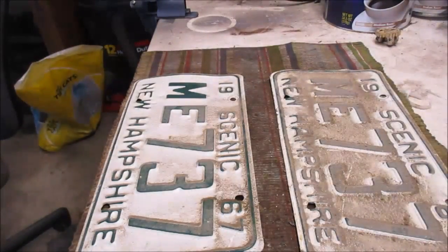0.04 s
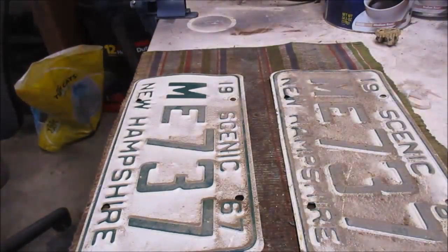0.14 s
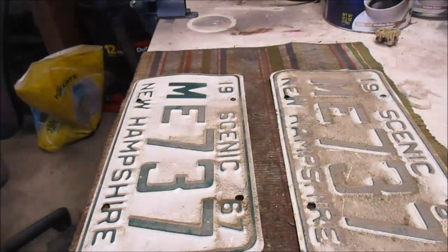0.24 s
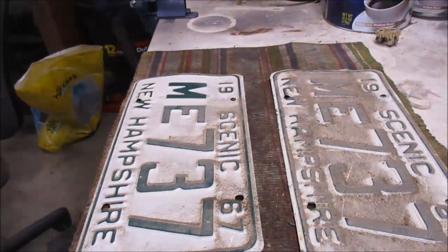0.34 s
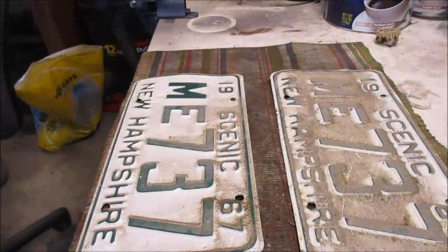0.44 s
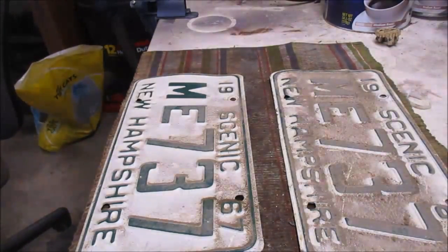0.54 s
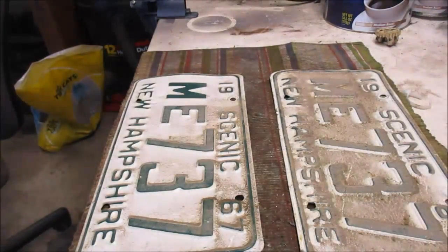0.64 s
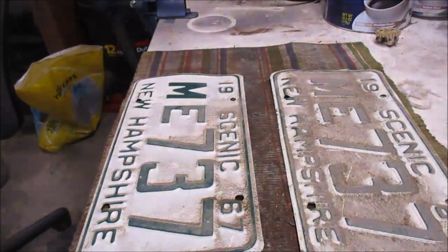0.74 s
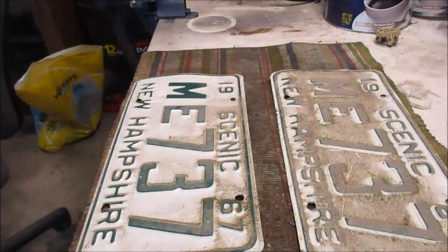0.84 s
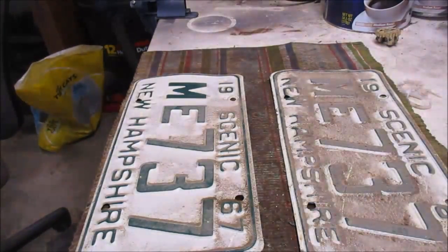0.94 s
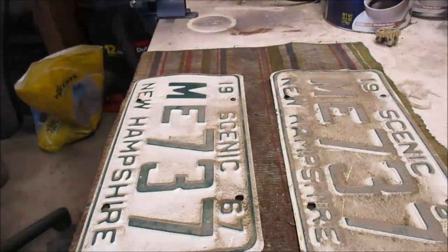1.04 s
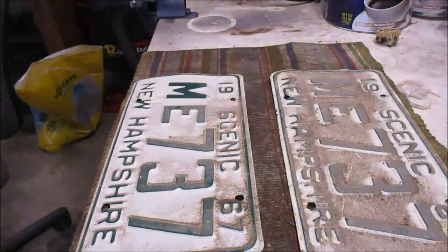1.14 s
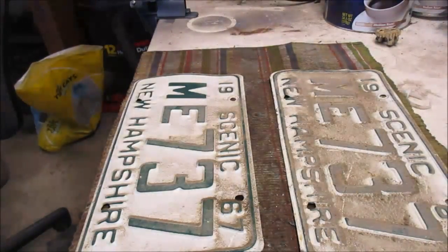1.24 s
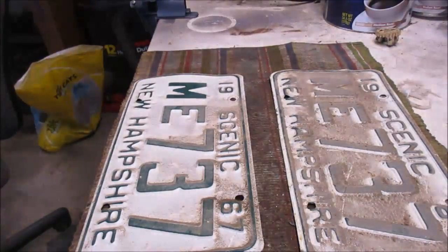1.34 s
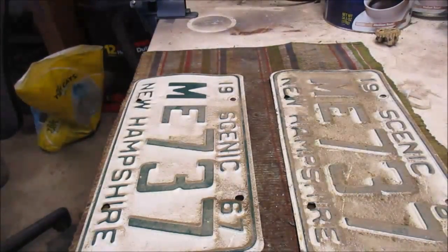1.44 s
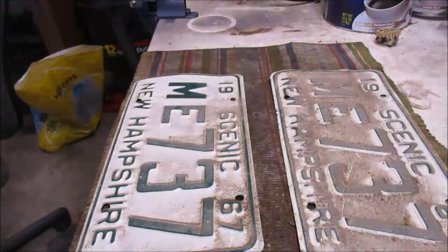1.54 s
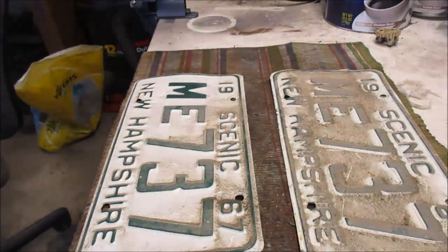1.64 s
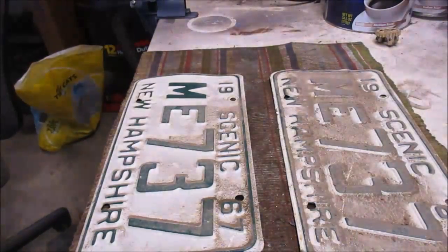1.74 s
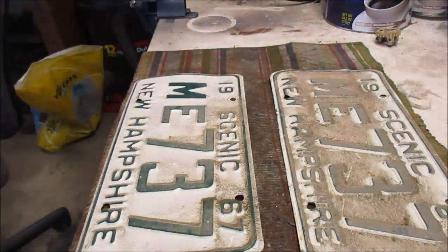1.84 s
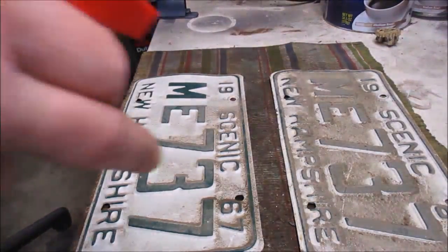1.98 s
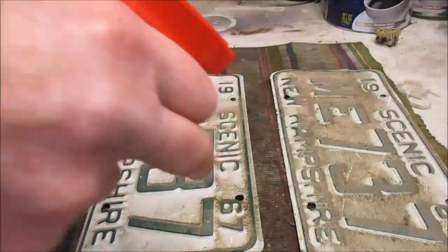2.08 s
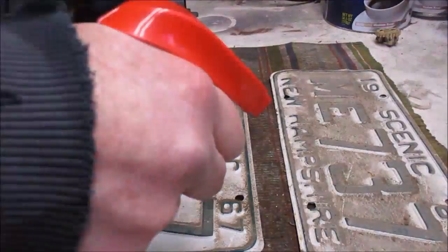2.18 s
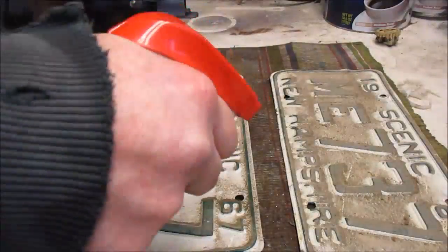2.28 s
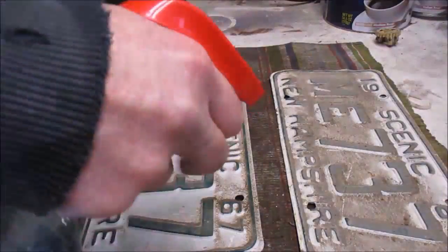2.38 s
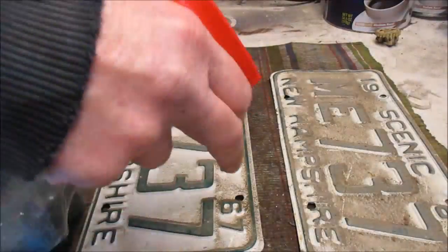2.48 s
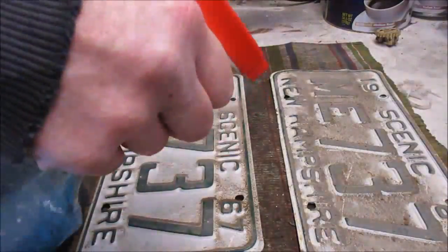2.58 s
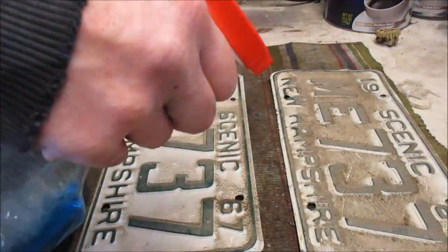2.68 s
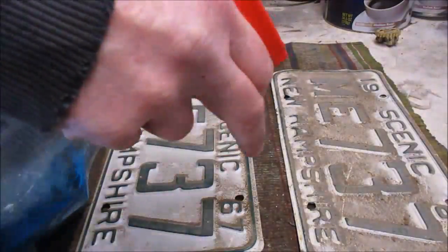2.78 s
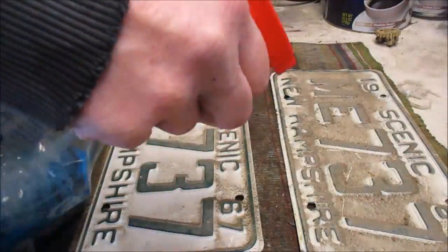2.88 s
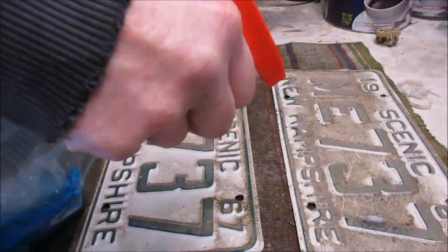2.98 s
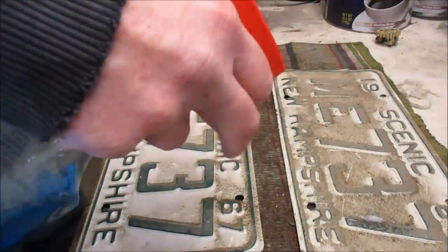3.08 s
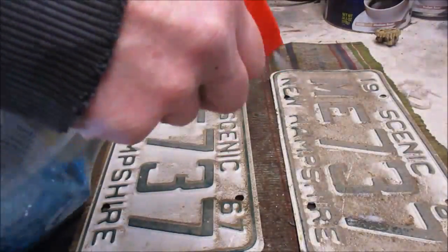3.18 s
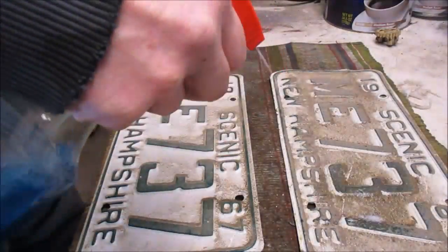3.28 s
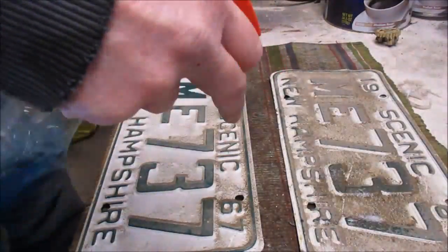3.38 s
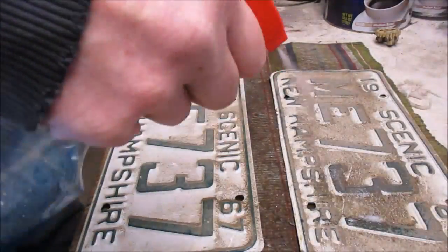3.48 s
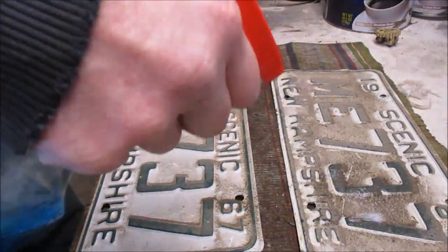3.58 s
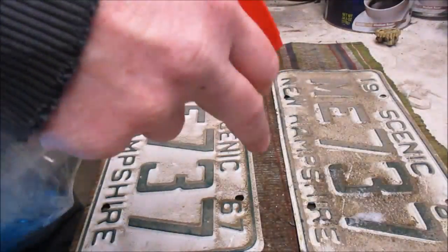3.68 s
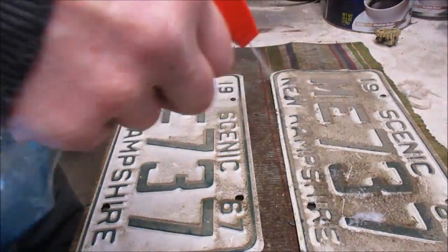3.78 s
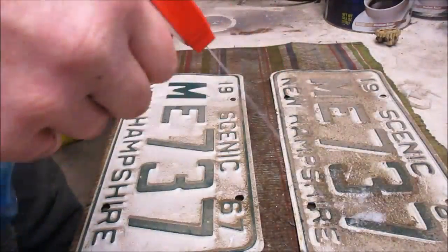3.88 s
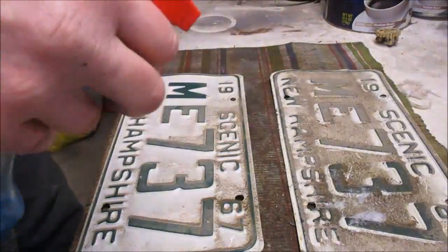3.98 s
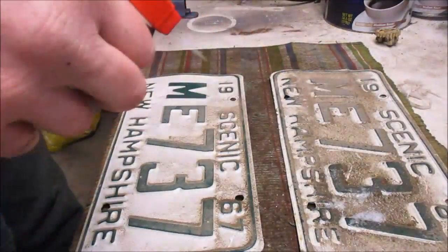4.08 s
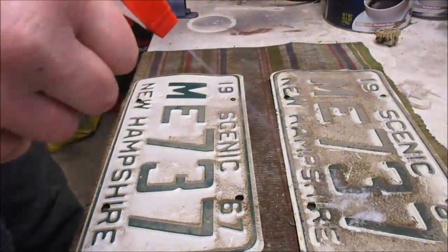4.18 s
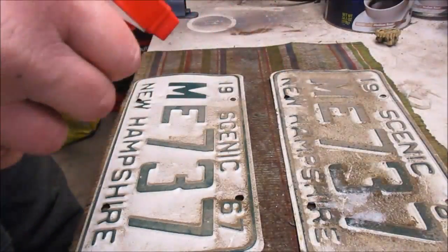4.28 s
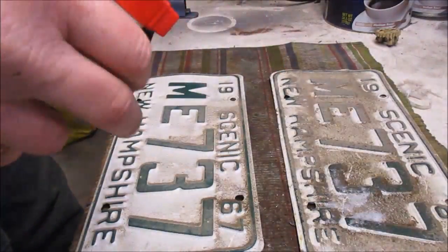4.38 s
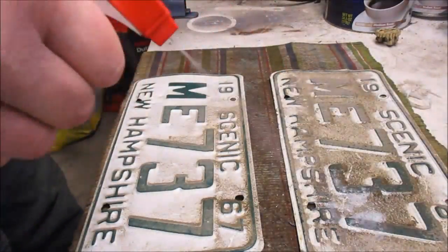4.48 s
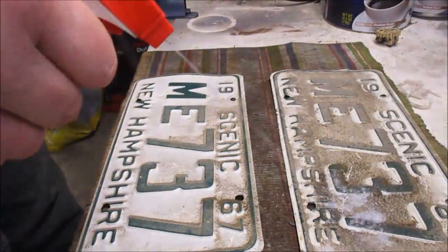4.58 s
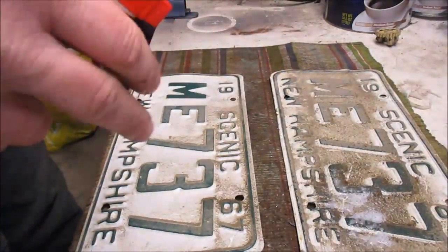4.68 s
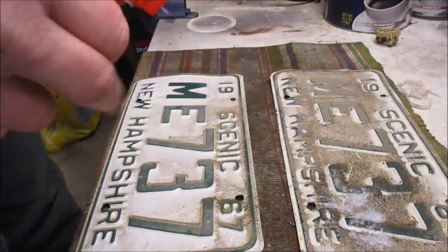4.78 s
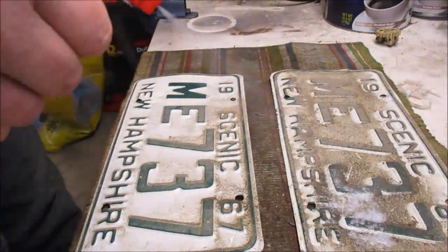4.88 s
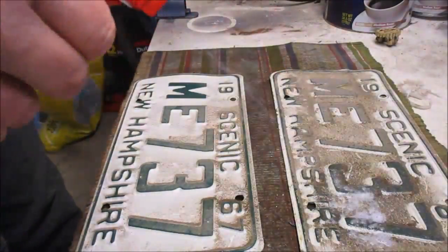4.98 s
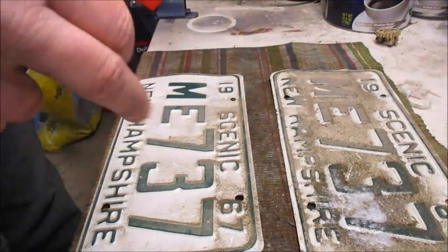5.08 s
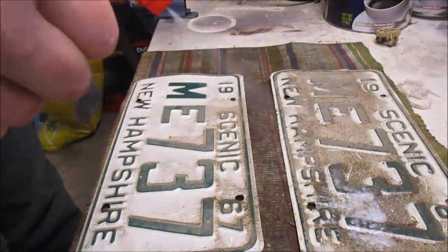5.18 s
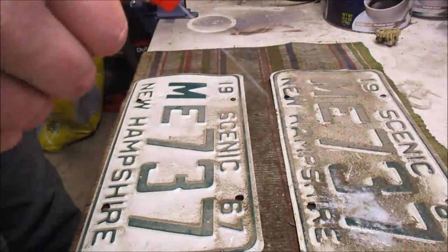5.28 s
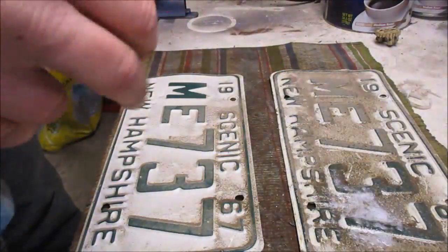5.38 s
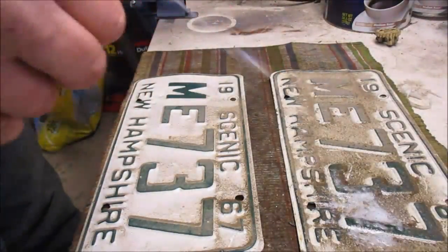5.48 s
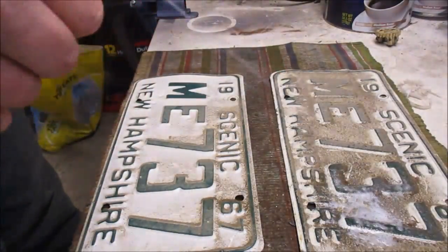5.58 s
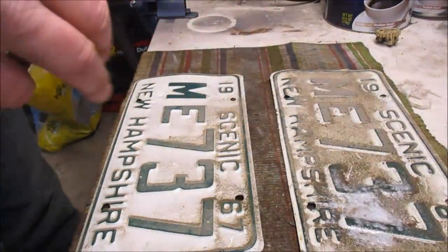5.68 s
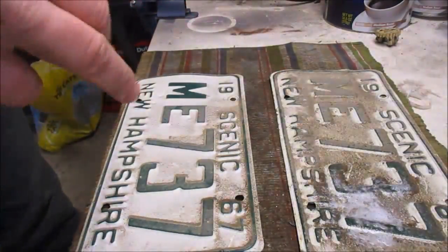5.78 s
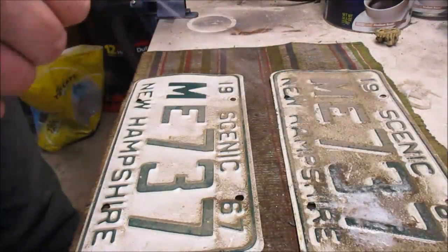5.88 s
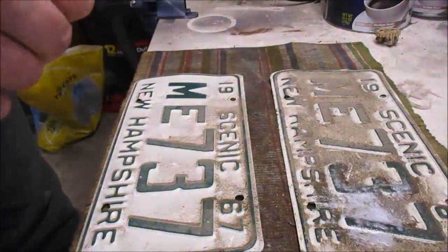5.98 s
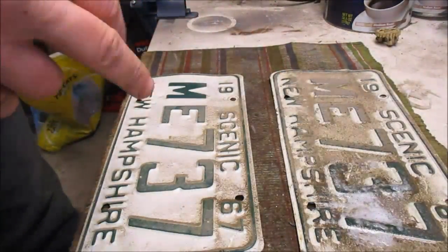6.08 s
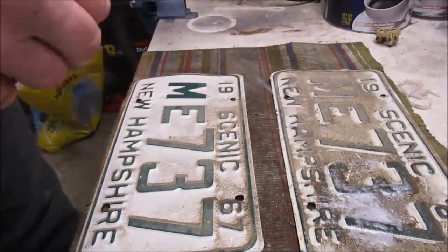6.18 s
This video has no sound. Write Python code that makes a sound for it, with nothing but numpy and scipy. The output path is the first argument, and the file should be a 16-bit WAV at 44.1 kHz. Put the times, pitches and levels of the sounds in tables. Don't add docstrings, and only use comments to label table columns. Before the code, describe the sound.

After two quiet seconds of room tone and faint rustles, a plastic trigger sprayer knocks, then spritzes rapidly in short wet hisses about three times a second.

```python
import sys
import numpy as np
from scipy import signal
from scipy.fft import rfft, irfft, next_fast_len
from scipy.io import wavfile
from scipy.ndimage import uniform_filter1d

SR = 44100
rng = np.random.default_rng(int(sys.argv[2]) if len(sys.argv) > 2 else 0)


def output_pcm(signal):
    pcm = np.clip(np.atleast_2d(signal).T, -1, 1) * 32767
    wavfile.write(sys.argv[1], SR, np.round(pcm).astype(np.int16))


def volts(x):
    e = np.asarray(x, float) / 20
    return 10 ** e


N = 275013
TOP_HZ = 15800

# (time [s], level [dB])
ROOM_LEVEL = [
    (0.0, -50),
    (2.36, -50.5),
    (2.6, -56.5),
    (3.14, -58.5),
    (3.34, -54),
    (4.17, -52),
    (5.21, -52.5),
    (6.0, -46.5),
    (6.24, -48.5),
]
# (frequency [Hz], density [dB per Hz])
ROOM_COLOUR = [(12, -44), (20, -8.5), (74, 2.5), (146, -8.5), (198, 0.5), (270, -4.5), (293, -3), (542, -2),
               (897, -7), (1030, -6), (1260, -7), (1440, -9.5), (3950, -24), (8410, -28), (16000, -39)]
# (frequency [Hz], level [dB])
HUM_HARMONICS = [(302, -2), (608, -2), (915, -1)]
# (time [s], first [dB], second [dB], third harmonic [dB])
HUM_SWELL = [(0.0, -58, -60, -60), (.13, -54, -58, -60), (.24, -62, -60, -60), (.36, -64, -55, -66),
             (.5, -57, -58, -58), (.62, -59, -68, -58), (.72, -60, -63, -68), (.87, -58, -54, -57),
             (1.0, -65, -60, -70), (1.15, -63, -62, -57), (1.4, -72, -61, -59), (1.7, -72, -70, -68),
             (2.05, -70, -58, -70), (2.4, -68, -57, -68), (2.9, -72, -68, -72), (4.3, -66, -61, -66),
             (5.0, -68, -63, -67), (6.24, -77, -72, -77)]
# (start [s], hold [s], level [dB], fade [dB per s], rise [dB per s])
BRUSHES = [
    (0, .01, -55, 110, 600),
    (.32, 0.099, -54, 110, 600),
    (0.4365, 0.025, -46, 130, 8000),
    (0.874, 0.15, -56, 100, 600),
    (1.532, 0.045, -51, 172, 600),
    (1.617, 0.036, -50.5, 174, 600),
    (1.82, .01, -56.5, 103, 600),
    (2.227, .01, -56, 15, 600),
]
# (frequency [Hz], density [dB per Hz])
RUSTLE_COLOUR = [(590, 0.5), (1000, -5), (1570, -8), (1810, -9.5), (4120, -14.5), (10500, -26.5),
                 (16000, -48)]
# (time [s], peak [dB], pitch [Hz], t60 [s], answer of the hollow bottle [dB])
HANDLING = [
    (0.281, -40.5, 318, 0.051, -6),
    (0.869, -30, 190, 0.035, -20),
    (0.957, -44, 282, 0.045, -6),
    (1.489, -39, 670, 0.036, -8),
    (1.5745, -26.5, 565, 0.055, -14),
    (2.139, -15.5, 280, 0.015, -1),
    (2.22, -31, 640, 0.04, -8),
    (2.259, -43, 220, 0.073, -1),
]
# (time [s], peak [dB], pitch [Hz], t60 [s])
BODY_THUMPS = [(2.495, -12.5, 388.4, 0.041), (2.548, -26.5, 353, 0.028), (2.821, -19, 310, 0.024),
               (2.87, -27.5, 337, 0.02), (3.119, -20.5, 390, 0.033), (3.161, -26.5, 337, 0.0078),
               (3.401, -24.5, 297, 0.058), (3.48, -25.5, 320, 0.031), (3.712, -21.5, 324, 0.027),
               (3.795, -19.5, 314, 0.037), (4.052, -21.5, 325, 0.055), (4.118, -21.5, 327, 0.038),
               (4.399, -21, 330, 0.046), (4.466, -20, 313, 0.045), (4.75, -18, 328, 0.063),
               (4.816, -21.5, 333, 0.04), (5.068, -20, 350, 0.025), (5.162, -21, 330, 0.046),
               (5.443, -18, 350, 0.039), (5.496, -20.5, 336, 0.047), (5.775, -14.5, 322, 0.05),
               (5.846, -15.5, 327, 0.038), (6.1305, -16.5, 335, 0.034), (6.191, -24, 297, 0.035)]
# (time [s], peak [dB], pitch [Hz])
NUDGES = [(2.389, -32, 313), (2.741, -38, 288), (2.769, -39, 286), (3.054, -40.5, 270), (3.378, -31, 302),
          (3.474, -39, 328), (3.663, -32.5, 294), (3.78, -40, 346), (3.985, -36, 276), (4.04, -32, 302),
          (4.097, -34.5, 350), (4.33, -41.5, 327), (5.021, -36.5, 340), (5.144, -35, 328),
          (5.367, -42.5, 270), (5.401, -34.5, 460), (5.425, -38, 340), (5.484, -35, 292),
          (5.699, -33.5, 340), (5.734, -34, 358), (6.055, -24.5, 320), (6.14, -16, 337)]
# (frequency [Hz], level [dB], t60 [s])
BOTTLE_MODES = [(350, -12.5, 0.083), (270, -10.5, 0.073), (500.5, -15.5, 0.041), (604, -20, 0.073),
                (1072, -19, 0.049), (1258, -18, 0.03)]
# (time [s], peak [dB], pitch [Hz], t60 [s])
WRIST_BUMPS = [
    (0.283, -45, 125, 0.24),
    (0.868, -42, 110, 0.06),
    (2.139, -34, 150, .04),
    (2.256, -35, 83.5, 0.099),
    (3.48, -39.5, 114, 0.15),
    (3.808, -48.5, 102, 0.21),
]
# (time [s], peak [dB], pitch [Hz], t60 [s])
WALL_CLACKS = [
    (2.14, -16.5, 444, 0.044),
    (2.4955, -17, 1204, 0.022),
    (2.8205, -13, 537, 0.029),
]
# (time [s], peak [dB], pitch [Hz], t60 [s])
FINGER_TAPS = [
    (1.585, -34, 610, 0.074),
    (1.594, -41, 500, .06),
    (2.629, -38.5, 325, 0.04),
    (3.361, -32, 300, .025),
    (4.667, -36, 317, 0.045),
]
# (time [s],
# peak [dB], pitch [Hz], t60 [s])
CONTACTS = [(4.0213, -28, 8300, .004), (4.096, -39, 2600, .008), (4.328, -47, 4800, .006),
            (4.702, -19, 8300, 0.0045), (5.403, -19, 7760, .004), (.4355, -30, 1230, .012),
            (1.456, -38, 4970, .006), (1.4556, -42, 2800, .006), (1.464, -44, 5200, .006),
            (1.49, -35, 950, .02), (1.65, -37, 1100, .015), (1.8095, -31, 1480, .006),
            (1.809, -46, 3600, .005), (2.4959, -10, 1350, 0.0092), (2.4963, -10, 4440, .015),
            (2.4973, -4, 6390, .018), (2.4977, -23, 9300, .007), (2.4978, -16, 11500, .007),
            (2.4987, -22, 2500, 0.011), (2.8202, -20.5, 1220, 0.021), (2.8203, -27.5, 2700, .012),
            (2.8217, -16, 1920, 0.0099), (2.8227, -8.5, 5900, .012), (2.8226, -12, 4410, 0.0087),
            (2.8228, -9.5, 10100, .006), (2.8262, -33, 10800, .01), (3.1155, -23, 4480, 0.0062),
            (3.115, -28, 8700, .007), (3.1156, -24.5, 3050, .008), (3.1165, -24, 1540, 0.018),
            (3.1192, -26, 5600, 0.01), (3.1232, -26, 5950, 0.012), (3.1218, -24, 2580, .018),
            (4.749, -8.5, 8070, 0.01), (4.7489, -10.5, 3670, 0.0068), (4.7487, -21, 2090, 0.028),
            (4.7548, -29, 8300, .012), (6.1297, -15, 2900, 0.0083), (6.1294, -21, 7900, .01),
            (6.1297, -27, 2160, .035), (6.1406, -5, 8300, .009), (6.1405, -13.5, 3000, 0.017),
            (6.1404, -13, 5100, .008), (6.1405, -18, 2140, .03), (6.1406, -17, 3960, 0.028),
            (6.1406, -16, 11400, 0.0064), (6.1418, -19, 4030, .008), (6.144, -26, 2410, .01),
            (6.149, -29, 8200, .008), (2.4986, -14, 6230, .006), (2.505, -25, 6000, .008),
            (2.8238, -20, 6160, .006), (4.7503, -23, 5610, .006),
            (.4354, -35, 990, .008), (2.214, -32, 430, .03), (2.2215, -36, 1600, .012),
          (2.224, -28, 950, .025), (2.232, -30, 480, .04), (2.238, -33, 650, .03), (2.246, -34, 830, .03),
          (2.259, -35, 900, .03), (2.174, -38, 800, .04), (2.14, -28, 1000, .02), (.8715, -34, 330, .012),
          (1.541, -44, 600, .06), (1.57, -38, 520, .02), (3.689, -35, 380, .03), (3.689, -35, 1200, .02),
          (3.59, -43, 300, .03), (5.79, -26, 360, .03), (5.79, -34, 1250, .02), (5.847, -28, 1230, .03),
          (4.408, -30, 380, .03), (4.273, -36, 1200, .015), (4.097, -38, 1300, .012),
          (4.362, -42, 1250, .02), (3.776, -40, 1350, .02)]
# (time [s], peak [dB], centre [Hz])
EDGE_SNAPS = [(2.496, -12, 5000), (2.4975, -9, 11000), (2.82, -28, 6000), (2.8228, -8, 10000),
              (3.1156, -20, 6000), (3.123, -30, 8000), (4.749, -6, 7000), (2.823, -12, 12000),
              (6.1295, -16, 6000), (6.1405, -14, 8000), (.4355, -36, 3000), (.453, -38, 4000),
              (.446, -42, 7000)]
# (time [s], peak [dB], low share [dB], top share
# [dB], strongest ring [Hz])
TRIGGER_KNOCKS = [(0.4358, -47, 14, -16, 1590), (1.4555, -48, -4, -26, 5140), (1.8088, -55, 23, -29, 1820),
                  (2.1391, -34.5, 8.5, -25, 1800), (2.4957, -9.5, -2, -10, 6100), (2.8226, -15, 1, 5, 5300),
                  (3.1153, -20, 2, -40, 1490), (3.401, -40.5, 16.5, -12, 1610),
                  (3.7133, -33.5, 10, -15, 3350), (3.7948, -40, 2, -10, 1490),
                  (4.0518, -32.5, 10, -20, 1730), (4.399, -36, -15, -25, 7800),
                  (4.4647, -32.5, -19, -19, 2190), (4.7487, -16, 5, -1, 8200), (4.8164, -50, 15, 2, 2000),
                  (5.0694, -33.5, 8.5, -14, 7880), (5.163, -35, 6, -6, 1760), (5.775, -22, 5, -13, 8200),
                  (6.1291, -16, 2.5, -4, 3080), (6.1403, -16, 0, -5, 3880)]
# (frequency [Hz], level [dB], t60 [s])
TRIGGER_MODES = [(1223, 3, 0.12), (2060, -2, 0.042), (3317, -25, 0.07), (4120, -25, 0.058),
                 (5100, 3, 0.024), (5900, -22, 0.2), (7060, -26, 0.075), (7200, -9, 0.07), (8300, 11, 0.04),
                 (9900, -29, 0.058)]
# (time [s], valve pop [dB], its low share [dB], refill [dB], refill once the rush is over [dB])
RELEASES = [(2.4206, -27, -7, -38, -42), (2.7714, -35, -8.5, -50, -37), (3.0842, -28.5, -15, -40, -35),
            (3.382, -29, -2, -28, -55.5), (3.688, -24.5, -6.5, -27, -47), (4.021, -23.5, -39, -26, -42.5),
            (4.3611, -20.5, -14, -25, -47), (4.7017, -22.5, -37, -27, -37), (5.0484, -19, -19, -26, -58),
            (5.4032, -24.5, -19, -19, -50), (5.7362, -14.5, -22, -34, -30), (6.0879, -27.5, -8, -34, -30)]
# (time [s], peak
# [dB], low share [dB])
TICKS = [(1.65, -50, 7), (2.081, -49, -17), (2.2204, -47, 10), (2.439, -33, -1), (2.456, -40, 3),
         (2.4836, -35, -1), (2.4972, -16.5, -10.5), (2.873, -30, -25), (2.8833, -29.5, -19),
         (2.897, -24.5, -14), (2.9187, -28, -15), (3.482, -39, -1), (3.457, -46, -15), (3.4745, -39, -20),
         (3.7304, -38, -14), (3.748, -43, -20), (3.761, -44, -20), (3.777, -42.5, 5), (3.7852, -41, -23),
         (4.116, -36, -3), (4.4012, -23, -8.5), (4.436, -39, -15), (4.455, -35, -5), (4.487, -40, -19),
         (4.799, -42, -10), (5.141, -45, 2), (5.4454, -35, 0), (5.461, -39, -5), (5.4714, -48, 5),
         (5.5006, -27.5, -27), (5.848, -21.5, -5), (5.882, -31, -25), (5.9985, -28, -4), (6.1016, -38, 1),
         (6.1779, -33, -19)]
# (frequency [Hz], density [dB per Hz])
SLURP_COLOUR = [(530, -67), (900, 2.5), (1670, 0.5), (2200, 1.5), (3990, -4.5), (4880, -1.5), (5700, -6.0),
                (8250, 4.0), (11000, -11.5), (13100, -19.0), (15500, -29)][:-1]
# (time [s], scrape [dB], rumble [dB])
GRIP_SLIPS = [
    [(2.15, -34, -35.5), (2.2, -54, -52), (2.225, -40, -52), (2.42, -66, -50)],
]
# (start [s], surge [s], end [s], first hiss [dB], surge [dB])
SQUEEZES = [(2.165, 2.193, 2.25, -60, -45), (2.565, 2.591, 2.51, -72, -58.5),
            (2.86, 2.93, 3.02, -54, -45.5), (3.193, 3.287, 3.365, -42.5, -45),
            (3.499, 3.563, 3.676, -50, -37), (3.817, 3.889, 4, -45, -35), (4.143, 4.205, 4.316, -37.5, -33),
            (4.489, 4.544, 4.67, -36.5, -31.5), (4.834, 4.927, 5.05, -38, -39.5),
            (5.195, 5.257, 5.37, -45.5, -30), (5.525, 5.63, 5.7, -36.5, -29),
            (5.869, 5.928, 6.085, -33.5, -30.5), (6.199, 6.234, 6.35, -35.5, -43)]
# (frequency [Hz], density [dB per Hz])
MIST_COLOUR = [(1470, -34.0), (2500, -12.0), (3140, -7.0), (3830, -7), (4200, -4.5), (4680, -7),
               (5050, -5.0), (7980, -2.5), (8740, -1.5), (10100, -8.0), (13500, -6.5), (15800, -12)]
# (time [s], above [Hz])
THINNED = [(.71, 3000), (1.178, 3500), (1.39, 3500), (1.755, 3000), (1.768, 5000), (1.764, 5600),
           (1.77, 5600), (1.838, 4000), (2.245, 3000), (2.33, 6000), (3.162, 2500), (3.525, 1000),
           (3.82, 9000), (3.958, 300), (4.23, 1500), (4.48, 2500), (4.615, 1000), (5.235, 200),
           (5.245, 200), (5.638, 2000)]
# (time [s], from [Hz], to [Hz])
GAPS = [
    (2.845, 2300, 4100),
    (2.845, 7300, 9400),
    (2.845, 12200, 17000),
    (5.238, 1500, 3200),
    (5.238, 3500, 4200),
]


def played(tables):
    rows = []
    for table in tables:
        first, last = table[0], table[-1]
        rows += [(first[0] - .003, -90, *first[2:]), *table, (last[0] + 0.038, -90, *last[2:])]
    s, *columns = np.transpose(sorted(rows))
    return [np.interp(np.arange(N) / SR, s, c) for c in columns]


def rms_one(x):
    return x / np.sqrt(np.mean(x ** 2) + 1e-20)


def band(x, low_hz, high_hz):
    sos = signal.butter(2, [low_hz, min(high_hz, .49 * SR)], "band", fs=SR, output="sos")
    return signal.sosfilt(sos, x)


def drift(rate):
    knots = rng.standard_normal(4000)
    return np.interp(np.arange(N) / SR * rate * 2, np.arange(4000), knots) * 1.22


def coloured(x, spectrum):
    size = next_fast_len(N)
    hz, level_db = np.transpose(spectrum)
    bins = np.arange(size // 2 + 1) * SR / size + 1
    shape = volts(np.interp(np.log(bins), np.log(hz), level_db, left=-60)) * (bins < TOP_HZ)
    return rms_one(irfft(rfft(x, size) * shape, size)[:N])


def grainy(per_s, spread_db, share):
    sizes = volts(spread_db * np.minimum(rng.exponential(1, N), 3)) * rng.choice([-1, 1], N)
    drops = rms_one(sizes * (rng.random(N) < per_s / SR))
    share = np.clip(share, 0, 1)
    return np.sqrt(share) * drops + np.sqrt(1 - share) * rng.standard_normal(N)


def decay(t, t60):
    return volts(-60 * t / t60)


def ringing(hz, t60, count):
    t = np.arange(count) / SR
    return np.sin(2 * np.pi * hz * t) * decay(t, max(t60, .003))


def add(out, s, sound):
    at = round(s * SR)
    out[at:at + len(sound)] += sound[:N - at]


def room_tone():
    t = np.arange(N) / SR
    s, level_db = np.transpose(ROOM_LEVEL)
    air = coloured(rng.standard_normal(N), ROOM_COLOUR) * volts(-0.5 + 0.3 * drift(3.0))
    out = air * volts(np.interp(t, s, level_db))
    wavering_s = np.cumsum(1 + 0.00395 * drift(6)) / SR
    s, *swells = np.transpose(HUM_SWELL)
    for (hz, db), swell_db in zip(HUM_HARMONICS, swells):
        level_db = db + 4.5 + 1.5 * drift(5) + np.interp(t, s, swell_db)
        out = out + volts(level_db) * np.sin(2 * np.pi * hz * wavering_s)
    return out


def rustle():
    t = np.arange(N) / SR
    level_db = np.max([db - rise * np.maximum(s - t, 0) - fade * np.maximum(t - s - hold, 0)
                       for s, hold, db, fade, rise in BRUSHES], axis=0)
    rub = coloured(grainy(per_s=2000, spread_db=4.0, share=.15), RUSTLE_COLOUR)
    return volts(level_db + .5 + 1.5 * drift(25)) * rub


def thumps():
    nudge_t60_s, sag_share, sag_s = 0.044, .04, .003
    out, t = np.zeros(N), np.arange(7000) / SR
    pushes = HANDLING + [(*row, 0) for row in BODY_THUMPS] + [(*row, nudge_t60_s, 0) for row in NUDGES]
    hurried = t + sag_share * sag_s * (1 - np.exp(-t / sag_s))
    chance = rng.normal(0, 1, (len(pushes), len(BOTTLE_MODES), 2))
    swell = np.minimum(t / .0022, 1)
    for (s, peak_db, pitch_hz, t60, hollow_db), draws in zip(pushes, chance):
        body = np.sin(2 * np.pi * pitch_hz * hurried) * decay(t, max(t60, .003))
        for (hz, level_db, ring_s), (more, detune) in zip(BOTTLE_MODES, draws):
            mode = ringing(hz * (1 + .05 * detune), ring_s, count=7000)
            body = body + volts(level_db + 3.2 * more + hollow_db) * mode
        add(out, s, volts(peak_db + 2.5) * swell * body)
    out = band(out, 212, 4700)
    for s, peak_db, pitch_hz, t60 in WRIST_BUMPS + WALL_CLACKS + FINGER_TAPS:
        add(out, s, volts(peak_db) * swell * ringing(pitch_hz, t60, count=7000))
    return out


def contacts():
    longest_cycles, shudder_db, shudder_t60_s = 33, -23.5, .045
    out, t = np.zeros(N), np.arange(3000) / SR
    sets_in = np.minimum(t / .0002, 1)
    for s, peak_db, pitch_hz, t60 in CONTACTS:
        shudder = rms_one(band(rng.standard_normal(3000), pitch_hz * .75, pitch_hz * 1.3))
        shudder = volts(shudder_db) * decay(t, shudder_t60_s) * shudder
        ring = ringing(pitch_hz, min(t60, longest_cycles / pitch_hz), count=3000)
        add(out, s, volts(peak_db) * sets_in * (ring + shudder))
    return out


def snaps():
    out, t = np.zeros(N), np.arange(200) / SR
    for s, peak_db, centre_hz in EDGE_SNAPS:
        fade = np.exp(-np.e * t * centre_hz / 1.2)
        add(out, s, -volts(peak_db + 6) * np.sin(2 * np.pi * centre_hz * t) * fade)
    return out


def knocks():
    crack_t60_s, softer_longer_db = 0.011, 0.41
    out, t = np.zeros(N), np.arange(4000) / SR
    rattle_fade = volts(-14.5) * decay(t, .05) + volts(-48) * decay(t, 0.083)
    for s, peak_db, low_db, top_db, ring_hz in TRIGGER_KNOCKS:
        noise = rng.standard_normal((3, 4000))
        low, mid, top = noise * (1 + 2.0 * noise[:1] ** 2)
        t60 = max(crack_t60_s * volts(-softer_longer_db * (peak_db + 20)), .004)
        head = decay(np.maximum(t - .0012, 0), t60) * np.minimum(.3 + t / .001, 1)
        crack = volts(low_db) * rms_one(band(low, 1020, 2440)) + rms_one(band(mid, 3400, 6930))
        crack = crack * (head + volts(-53) * decay(t, 0.018))
        top_fade = head ** 3.3 + volts(-28.0) * decay(t, 0.06)
        crack = crack + volts(top_db) * rms_one(band(top, 8800, 13200)) * top_fade
        rattle = rms_one(band(mid, ring_hz * .88, ring_hz * 1.12)) * rattle_fade
        crack = crack + rms_one(band(low, 1500, 13000)) * volts(-12) * decay(t, .06)
        for hz, level_db, ring_s in TRIGGER_MODES:
            zone_db = low_db if hz < 2500 else top_db - 8 if hz > 7000 else -4
            mode_db = level_db + rng.normal(0, 4) + zone_db - 5.0
            crack = crack + volts(mode_db) * ringing(hz, 0.38 * ring_s, count=4000)
        add(out, s, volts(peak_db) * (volts(-12) * crack + rattle))
    return out


def pops():
    valve_t60_s, tick_t60_s = 0.085, 0.047
    tick, puff, dull, t = np.zeros((2, N)), np.zeros(N), np.zeros(N), np.arange(5000) / SR
    rows = [(*row[:3], valve_t60_s, 0) for row in RELEASES] + [(*row, tick_t60_s, 1) for row in TICKS]
    for s, peak_db, low_db, t60, small in rows:
        fade = decay(t, t60)
        add(tick[small], s, volts(peak_db - 6) * decay(t, .01))
        add(puff, s, volts(peak_db - 15) * fade)
        add(dull, s, volts(peak_db + low_db - 6.0) * fade)
    white = rng.standard_normal((3, N))
    valve = tick[0] * rms_one(band(white[0], 4600, 11200))
    small_part = tick[1] * rms_one(band(band(white[0], 3900, 12000), 3500, 10800))
    air = puff * coloured(white[1], SLURP_COLOUR) + dull * rms_one(band(white[2], 480, 2200))
    return valve + small_part + air


def grip():
    scrape_db, rumble_db = played(GRIP_SLIPS)
    scrape = rms_one(band(grainy(per_s=500, spread_db=4.0, share=.5), 380, 1100))
    rumble = rms_one(band(rng.standard_normal(N), 40, 166))
    rumble_db = np.where(scrape_db > -85, rumble_db, -90)
    return volts(scrape_db) * scrape + volts(rumble_db) * rumble


def mist():
    jet_off_db, fall_curve = -65.5, 1.81
    bleed = np.linspace(0, 1, num=7)
    strokes = []
    for start, surge, end, first_db, surge_db in SQUEEZES:
        creep_db = first_db + 0.45 * (surge_db - first_db)
        fall_s = surge + bleed * max(end - surge, .03)
        fall_db = surge_db + (jet_off_db - surge_db) * bleed ** fall_curve
        strokes.append([(start, jet_off_db), (start + 0.017, first_db), (surge - 0.015, creep_db),
                        *zip(fall_s, fall_db)])
    level_db, = played(strokes)
    jet = coloured(grainy(per_s=5000, spread_db=3.5, share=.4), MIST_COLOUR)
    edges = np.geomspace(2500, 16000, 8)
    patches = sum((volts(2.1 * drift(30)) - 1) * band(jet, low, high) for low, high in zip(edges, edges[1:]))
    jet = rms_one(jet + patches) * volts(1.3 * drift(90) + 0.95 * drift(300))
    white = rng.standard_normal(N)
    splash = rms_one(band(white, 1140, 2180) + volts(-2.0) * band(white, 1080, 1440)) * volts(2.2 * drift(48))
    return volts(level_db) * jet + volts(0.81 * level_db - 20) * splash


def slurp():
    rush_s, refill_s, refill_end_db = 0.048, 0.11, -54.5
    level_db, = played([[(s, rush_db), (s + rush_s, after_db), (s + refill_s, min(after_db, refill_end_db))]
                        for s, _, _, rush_db, after_db in RELEASES])
    sputter = coloured(grainy(per_s=2500, spread_db=3.0, share=.4), SLURP_COLOUR)
    return volts(level_db - 10.5 + 2.8 * drift(110)) * sputter


def walls(x):
    t = np.arange(SR // 2) / SR
    tail = band(rng.standard_normal(len(t)), 88, 6900) * decay(t, 0.32) * np.minimum(t / 0.0013, 1)
    return signal.fftconvolve(x, tail / np.sqrt(np.sum(tail ** 2)))[:N]


def scene():
    sprayer = mist() + slurp() + pops() + knocks() + thumps() + grip()
    echo = volts(-21.5) * walls(sprayer)
    return (sprayer + echo + rustle() + room_tone() + contacts() + snaps())[None]


def thin(x):
    frame, share_kept, kept_gain_db = 1536, .12, 2.5
    out, window, hz = x.copy(), np.hanning(frame), np.fft.rfftfreq(frame, 1 / SR)
    for s, above_hz in THINNED:
        at = round(s * SR) - frame // 2
        lines = rfft(out[at:at + frame] * window)
        size = np.abs(lines)
        stands_out = uniform_filter1d(size, size=3) / uniform_filter1d(size, size=80)
        weak = (hz > above_hz) & (stands_out < np.quantile(stands_out, 1 - share_kept))
        kept = (hz > above_hz) & (hz < .9 * TOP_HZ) & ~weak
        out[at:at + frame] -= irfft(lines * (weak - (volts(kept_gain_db) - 1) * kept))
    for s, from_hz, to_hz in GAPS:
        at = round(s * SR) - frame // 2
        lines = rfft(out[at:at + frame] * np.minimum(2 * window, 1))
        out[at:at + frame] -= irfft(lines * (hz > from_hz) * (hz < to_hz))
    return out


def roll_off(x):
    return signal.sosfilt(signal.butter(12, 16870, fs=SR, output="sos"), x)


def record(dry):
    held = .95 * np.tanh(dry[0] / .95)
    shaved = signal.sosfilt(signal.ellip(6, .5, 18, TOP_HZ, fs=SR, output="sos"), held)
    mix = thin(shaved)[None]
    return roll_off(mix)


dry = scene()
out = record(dry)
output_pcm(out)
```